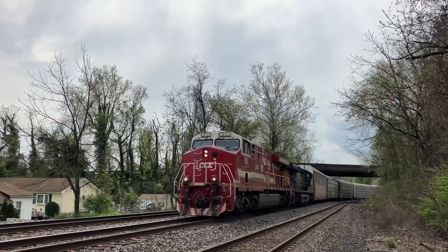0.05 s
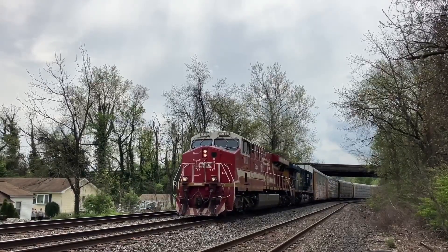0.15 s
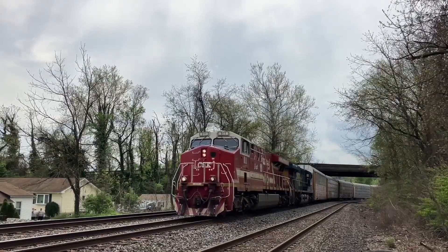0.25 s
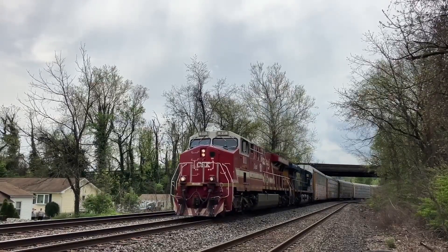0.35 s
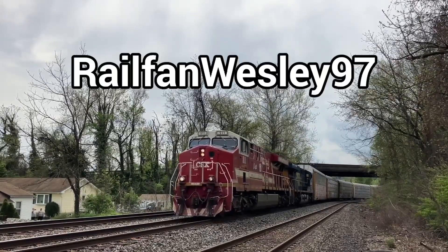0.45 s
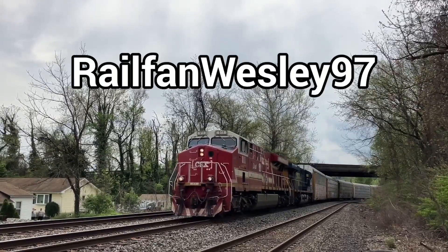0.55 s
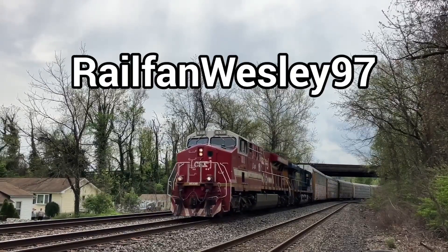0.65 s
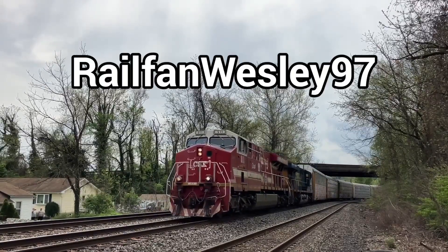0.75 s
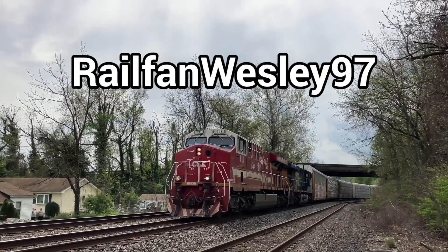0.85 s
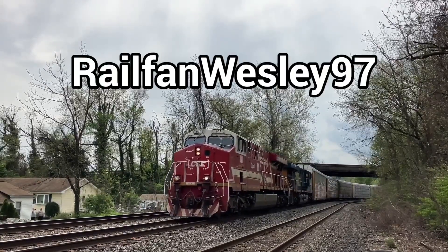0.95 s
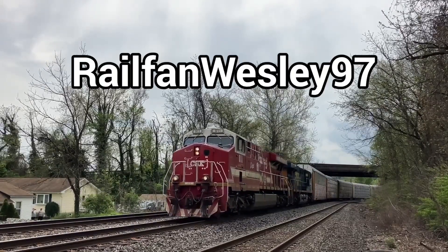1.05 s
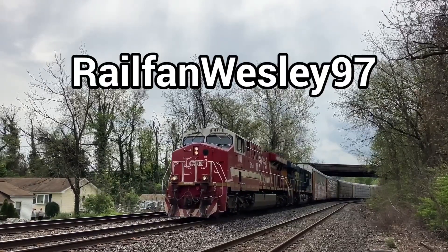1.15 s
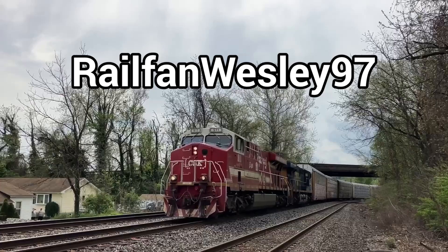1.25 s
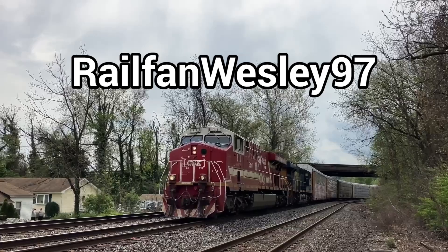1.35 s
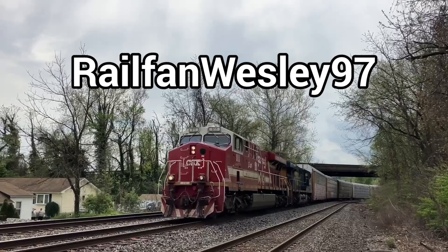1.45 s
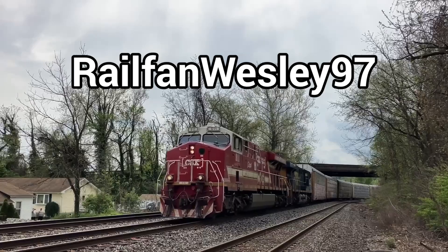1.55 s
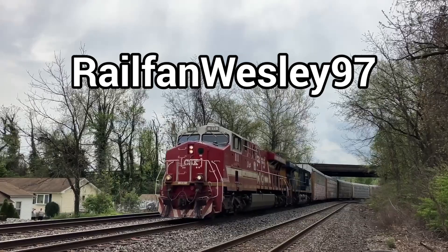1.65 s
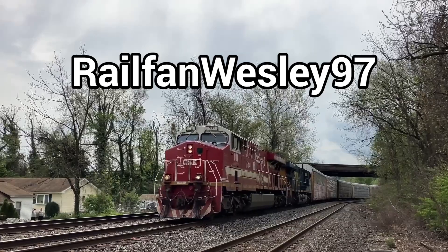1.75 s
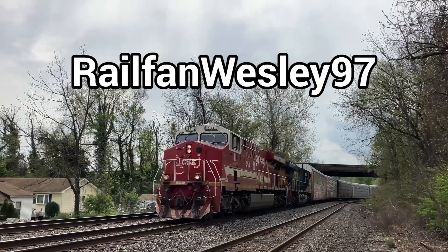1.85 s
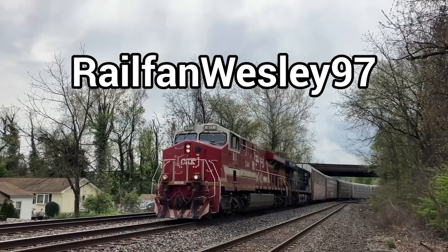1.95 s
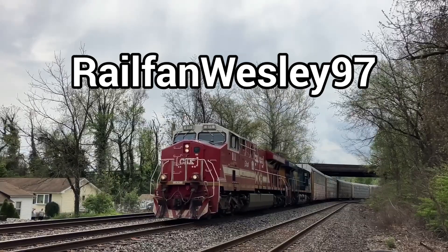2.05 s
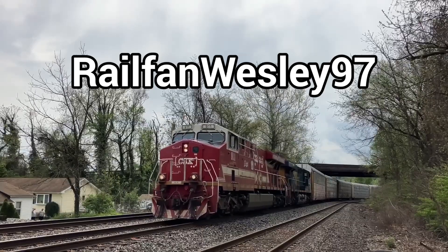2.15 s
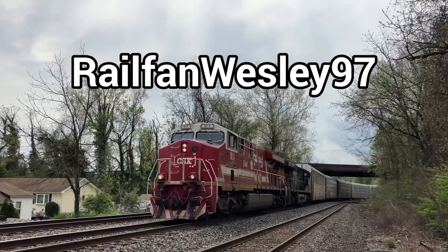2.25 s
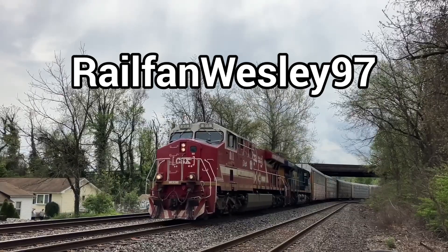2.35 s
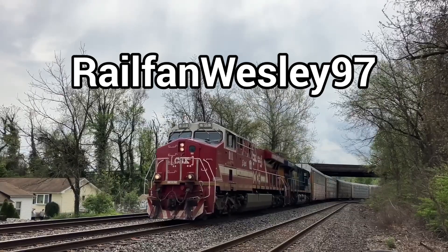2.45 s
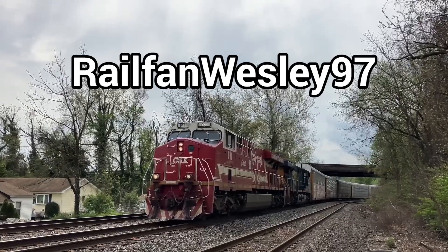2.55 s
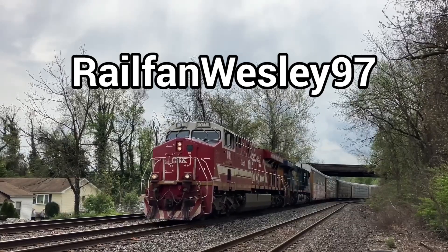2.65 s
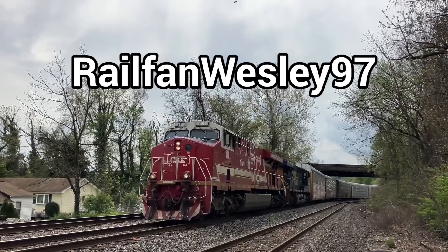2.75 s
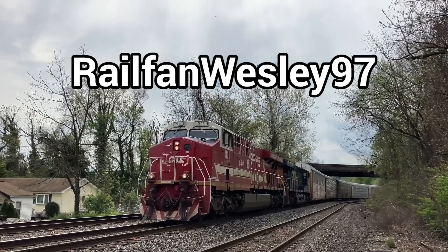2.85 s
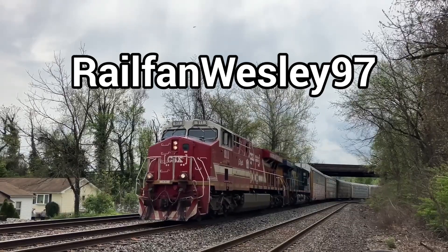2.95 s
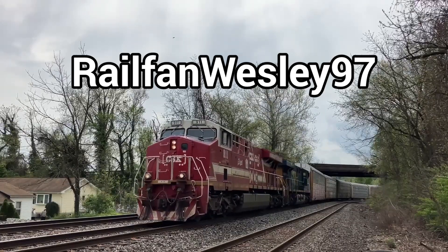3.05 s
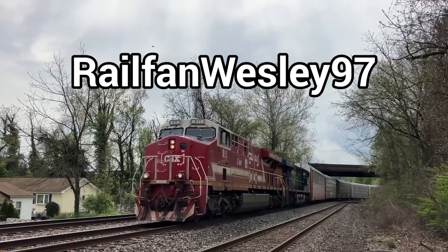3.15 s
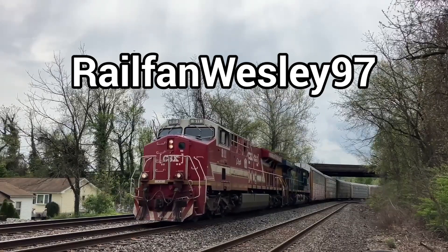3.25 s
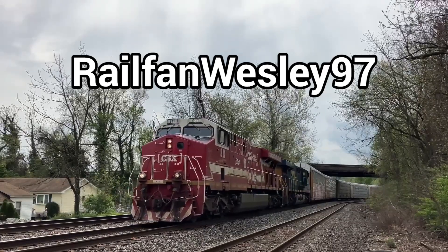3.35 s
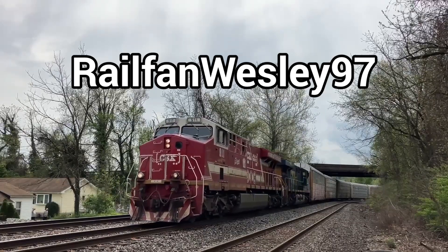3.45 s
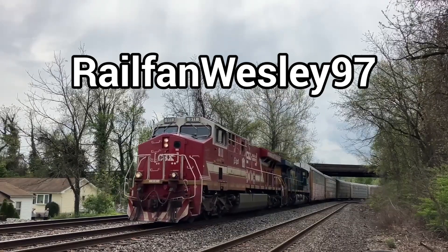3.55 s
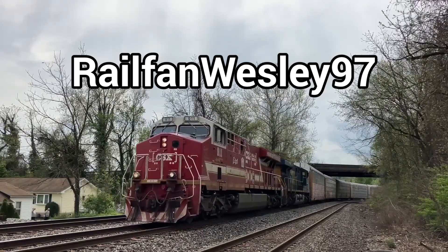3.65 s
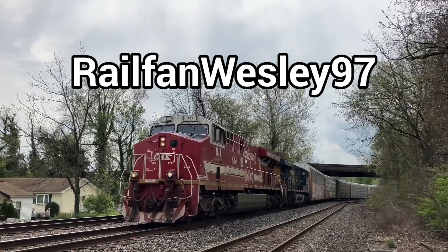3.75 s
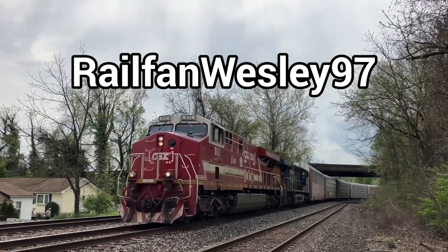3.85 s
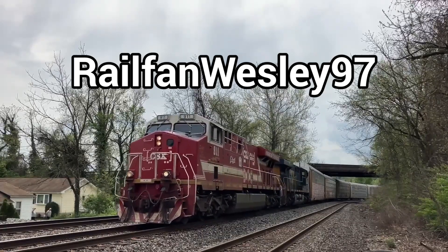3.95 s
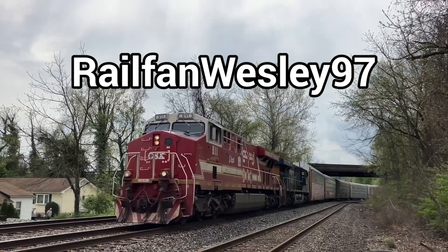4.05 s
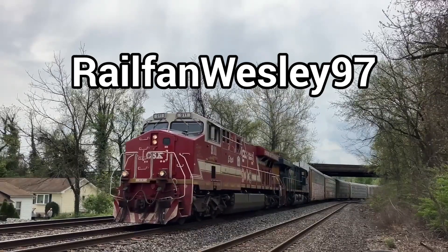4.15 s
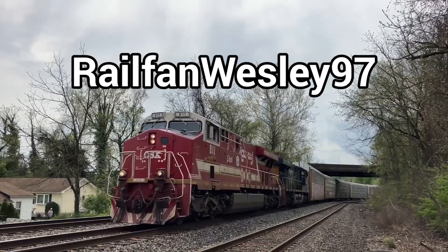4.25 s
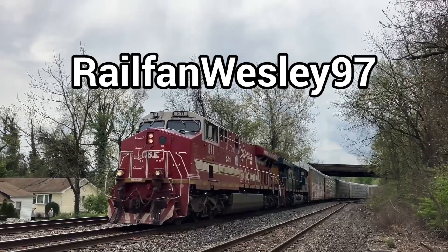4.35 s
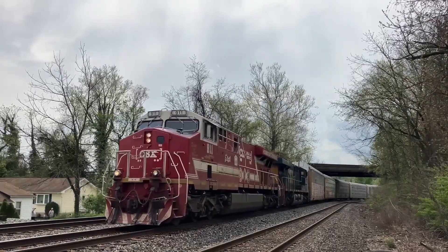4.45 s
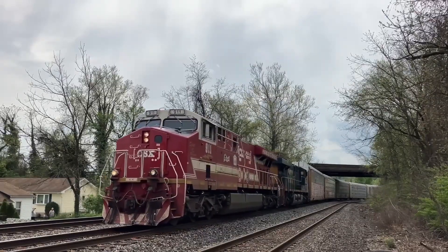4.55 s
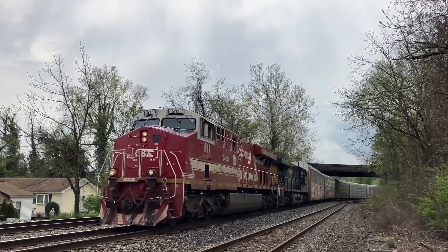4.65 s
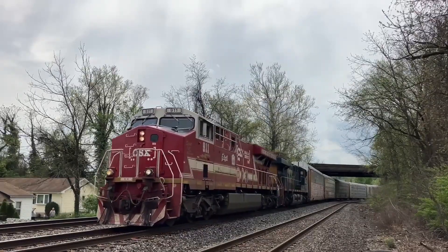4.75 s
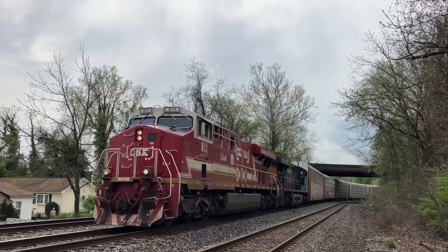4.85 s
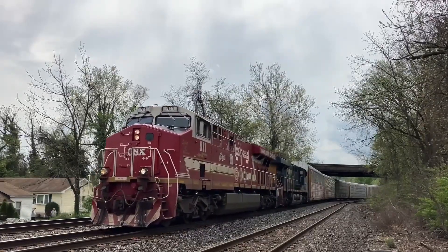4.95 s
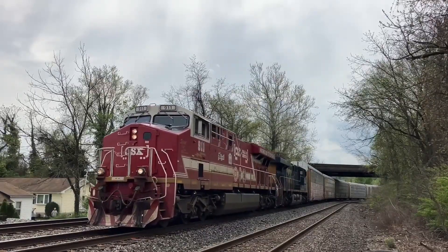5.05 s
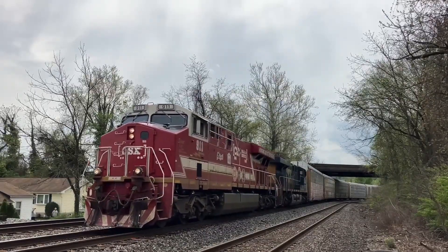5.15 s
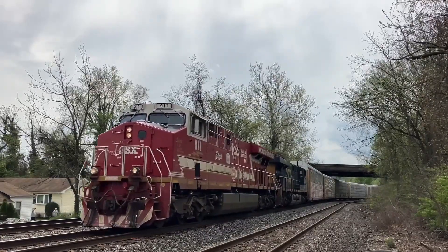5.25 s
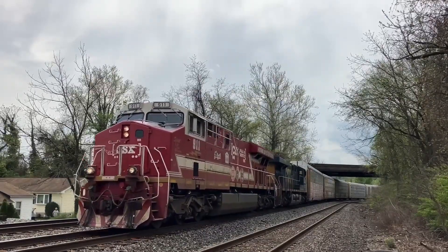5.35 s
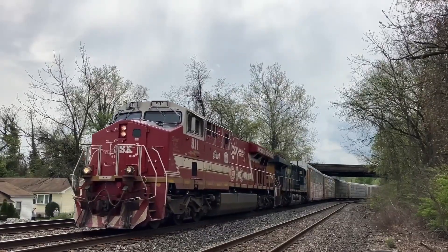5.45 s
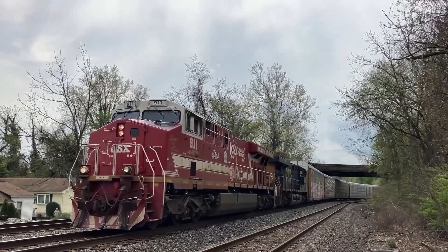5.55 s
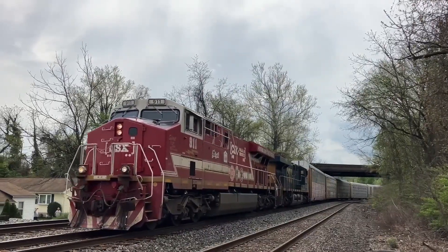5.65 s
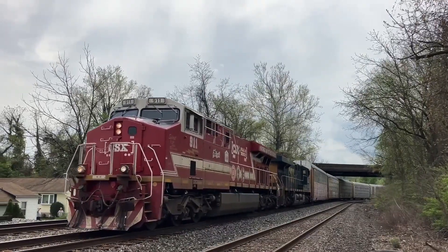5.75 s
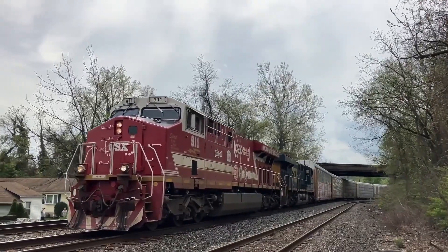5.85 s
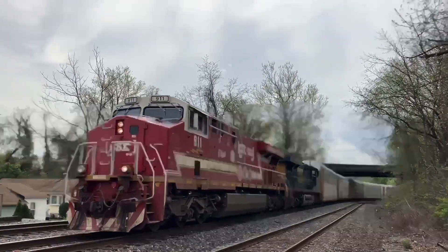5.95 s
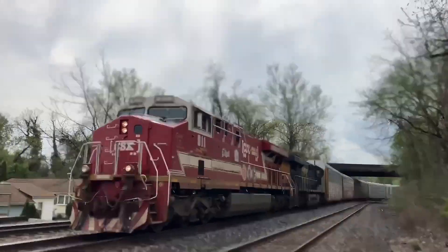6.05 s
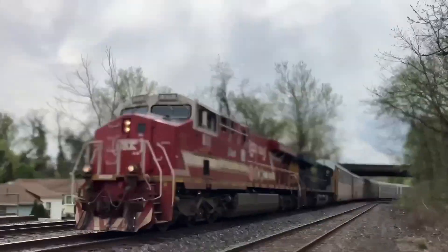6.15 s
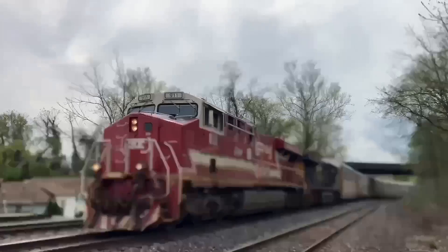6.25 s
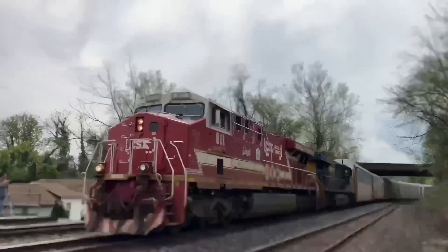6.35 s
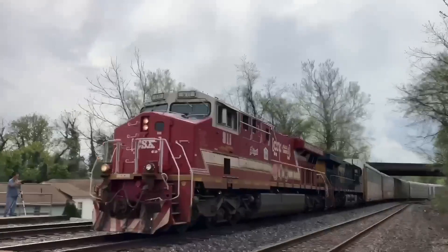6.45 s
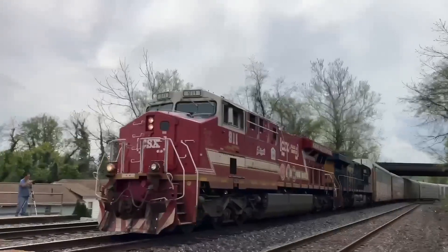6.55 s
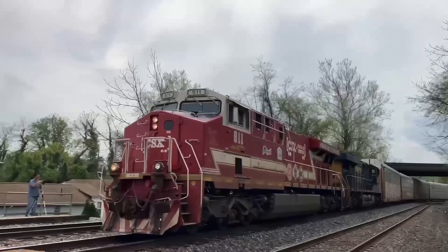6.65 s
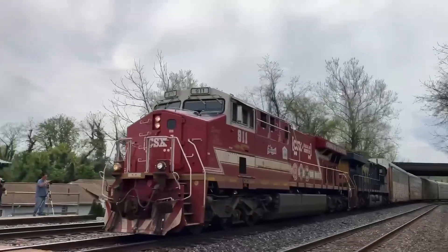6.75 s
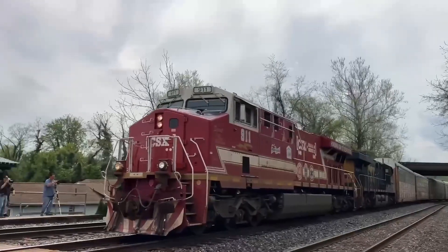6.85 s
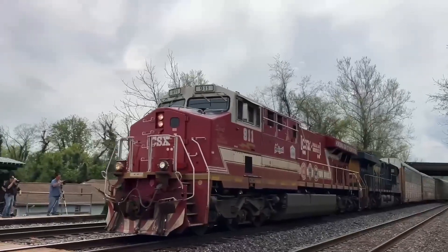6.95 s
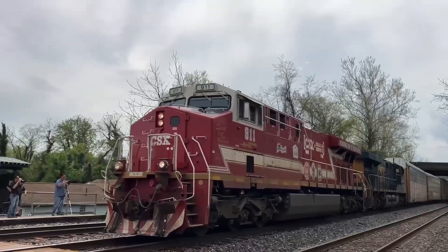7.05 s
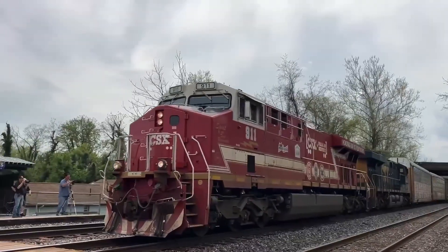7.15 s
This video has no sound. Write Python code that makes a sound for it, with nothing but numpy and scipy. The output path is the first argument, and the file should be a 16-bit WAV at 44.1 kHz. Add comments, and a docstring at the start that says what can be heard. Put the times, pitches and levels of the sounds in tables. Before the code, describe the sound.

Bright, even locomotive bell strokes ring over a low diesel throb and swelling rail hiss, just after a fading horn echoes off trees.

```python
"""The last chord of an air horn dies away among trees while a diesel freight train nears the microphone.
Its warning bell rings on: each stroke is a noisy crack, a short clang and long beating modes.
The exhaust throbs as a fuzzy note with side lines over turbulent noise, and a drone swells with effort.
Wheels roar and hiss on the rails as coloured noise. Late on, short noise snaps tick close to the microphone.
All is heard beside the track, through two microphone ports."""
import sys
import numpy as np
from scipy import signal
from scipy.fft import rfft, irfft
from scipy.io import wavfile
from scipy.ndimage import map_coordinates

SR = 44100
rng = np.random.default_rng(int(sys.argv[2]) if len(sys.argv) > 2 else 0)


def transcribe(u):
    """Save the signal u as a 16-bit wav file named by the first command-line argument.

    u: samples, shape (n,) or (channels, n), limited to [-1, 1]; the rate is SR.
    q: integer samples, one column per channel.
    """
    v = np.clip(np.atleast_2d(u).T, -1, 1)
    q = np.round(v * 32767).astype(np.int16)
    wavfile.write(sys.argv[1], SR, q)


N = 317520
T = np.arange(N) / SR  # time of every sample [s]


def amp(db):
    """Decibels to gain."""
    return 10 ** (np.asarray(db) / 20)


def unit(x):
    """Scales to rms 1."""
    return x / np.sqrt(np.mean(x ** 2) + 1e-20)


def read(points, hz):
    """Reads a frequency table at the given frequencies, along a logarithmic scale."""
    f, value = np.transpose(points)
    return np.interp(np.log(hz + 1), np.log(f + 1), value)


def curve(rows, axis=1):
    """One column of a time table at every sample."""
    rows = np.asarray(rows)
    return np.interp(T, rows[:, 0], rows[:, axis])


def add(mix, s, sound):
    """Lays a sound into the mix at time s, cut off where the mix ends."""
    start = max(round(s * SR), 0)
    part = mix[..., start:][..., :sound.shape[-1]]
    part += sound[..., :part.shape[-1]]


def drift(rate_hz):
    """Slow random wander of rms 1, weakened above the given rate."""
    points = 2048
    hz = np.fft.rfftfreq(points, T[-1] / points)
    lowpass = (hz > 0) / (1 + (hz / rate_hz) ** 4)
    slow = irfft(rfft(rng.standard_normal(points)) * lowpass)
    return unit(np.interp(T, np.linspace(0, T[-1], len(slow)), slow))


def burst(colour, t60, size):
    """A coloured puff of noise that dies away by 60 dB in t60 seconds."""
    spectrum = rfft(rng.standard_normal(size))
    noise = irfft(spectrum * amp(read(colour, np.fft.rfftfreq(size, 1 / SR))))
    return unit(noise) * amp(-60 * np.arange(size) / SR / t60)


def wash(colour, rolloff_db=12):
    """Steady coloured noise at two ports, partly alike; it falls by the octave above its last point."""
    # how alike the two ports hear the noise: (frequency [Hz], left-right likeness [0-1])
    likeness = [(60, .98), (150, .92), (300, .93), (640, .78), (1400, .78), (3000, .7), (5500, .55),
                (8000, .9), (15000, .92)]
    # phase between the ports: (frequency [Hz], lead of the left port [rad])
    left_lead = [(20, 0), (7200, -.2), (8200, -1.5), (9100, -3.1), (11200, -6.3), (13600, -9.4),
                 (15300, -12.4)]
    hz = np.fft.rfftfreq(N, 1 / SR)
    left, other = rfft(rng.standard_normal((2, N)))
    same = np.clip(read(likeness, hz), 0, 1)
    right = same * left + np.sqrt(1 - same ** 2) * other
    right = right * np.exp(-1j * read(left_lead, hz))
    octaves_above = np.log2(np.maximum(hz / colour[-1][0], 1))
    gain = amp(read(colour, hz) - rolloff_db * octaves_above)
    return unit(irfft(np.array([left, right]) * gain, N))


def fuzzy_tone(hz, width_hz, blur):
    """A tone whose strength and phase wander, of rms about 1."""
    turn = 2 * np.pi * (np.cumsum(hz * np.ones(N)) / SR + rng.random())
    in_step = (1 + blur * drift(width_hz)) * np.sin(turn)
    across = blur * drift(width_hz) * np.cos(turn)
    return (in_step + across) / np.sqrt(.5 + blur ** 2)


def level(start_db, db_per_s, effort_db):
    """Gain of a layer that grows as the train nears and as the engine pulls."""
    # the engine pulls harder, then eases off: (time [s], effort [0-1])
    effort = [(0, 0.25), (2.5, 0.27), (3, 0.83), (4.1, 1), (4.4, 0.93), (4.75, 0), (7.2, 0.02)]
    return amp(start_db + db_per_s * T + effort_db * curve(effort))


def horn():
    """The chord has just stopped: it lingers between the trees and comes back once from afar."""
    # partials of the fading chord: (frequency [Hz], level [dB], t60 of the direct sound and echo [s],
    # echo from the trees [dB re level], lingering sound [dB re level])
    partials = [(326.6, -51, 0.91, -3, -17), (391.6, -35.5, 0.85, -26, -16), (436, -48, 1.8, -15, -33.5),
                (523, -44.5, 0.25, -11, -1.5), (660, -46, 0.68, 5.5, -11), (955, -48.5, 0.88, -6, -22.5),
                (1043, -41.5, 0.72, -16, -19.5), (1150, -55.5, 1.1, -13, -24.5),
                (1282, -42.5, 0.79, -24, -47), (1500, -45, 0.9, -30, -50), (2024, -48.5, 1, -35, -41.5),
                (2680, -49, 0.94, -20, -33.5)]
    echo_s, echo_rise_s, linger_t60 = 0.27, 0.064, 5
    port_phase = 0.49  # rad by which each partial is turned, opposite ways at the two ports
    out = np.zeros((2, N))
    after_echo = T - echo_s
    for hz, db, t60, echo_db, linger_db in partials:
        direct = amp(-60 * T / t60)
        echo = amp(echo_db - 60 * np.maximum(after_echo, 0) / t60)
        echo = echo * np.clip(after_echo / echo_rise_s, 0, 1)
        linger = amp(linger_db - 60 * T / linger_t60) * (1 + .5 * drift(36))
        tone = signal.hilbert(fuzzy_tone(hz, width_hz=9, blur=0.3))
        apart = np.exp(1j * rng.choice([-1, 1]) * port_phase * np.array([[1], [-1]]))
        out += amp(db) * (direct + echo + linger) * (tone * apart).real
    return out


def engine():
    """Exhaust note beating with its side lines, turbulent throb, firing-pulsed rumble and a drone under load."""
    # exhaust note: (time [s], frequency [Hz])
    exhaust_note = [(0, 56.02), (1.2, 55.86), (2.2, 55.2), (2.65, 55.18), (3.5, 57.4), (4.05, 58.95),
                    (4.5, 62.3), (5, 61.16), (5.55, 59.36), (6.5, 57.33), (7.2, 54.8)]
    # lines beside the note, from unequal cylinders and from a second locomotive: (multiple of the note,
    # relative level [dB])
    cylinder_lines = [(0.798, -20), (0.932, -23), (1, 5), (1.134, -7), (1.199, -10.5), (1.301, -14.5),
                      (1.41, -16.5), (1.999, -30)]
    # exhaust loudness: (time [s], level [dB])
    exhaust_level = [(0, -32.5), (.45, -37), (.6, -29.5), (1.25, -32), (1.35, -26), (1.65, -30),
                     (1.9, -24.5), (2.25, -27.5), (2.55, -27), (3, -23), (4.3, -23), (4.4, -27.5),
                     (4.9, -27.5), (5.7, -23), (6.1, -26), (6.3, -23.5), (7, -29.5), (7.1, -23)]
    # turbulent exhaust spectrum: (frequency [Hz], relative level per Hz [dB])
    throb_colour = [(20, -39), (33, -14.5), (44, 2.5), (54, 24), (70, 11.5), (90, 14), (130, -47.5)]
    # rumble spectrum: (frequency [Hz], relative level per Hz [dB])
    rumble_colour = [(45, 6), (75, 6.5), (95, 3.5), (125, 1), (165, -6), (215, -17), (310, -12.5),
                     (420, -24), (700, -72)]
    # rumble: (level at the start [dB], growth [dB/s], rise at full effort [dB])
    rumble_level = (-42.5, 2.62, 4.1)
    # drone: (level at the start [dB], growth [dB/s], rise at full effort [dB])
    drone_level = (-60, 1.58, 16.6)

    note = curve(exhaust_note)
    lines = unit(sum(amp(db) * fuzzy_tone(k * note, width_hz=3, blur=.1) for k, db in cylinder_lines))
    exhaust = amp(curve(exhaust_level)) * (lines + amp(-5) * wash(throb_colour))
    firing = 1 + 0.22 * np.sin(2 * np.pi * np.cumsum(note) / SR)
    rumble = level(*rumble_level) * firing * wash(rumble_colour)
    # the drones sit at multiples of the exhaust note
    drone = fuzzy_tone(3.06 * note, width_hz=15.0, blur=0.92)
    upper_drone = amp(-6.5) * fuzzy_tone(5.26 * note, width_hz=90, blur=0.68)
    return exhaust + rumble + level(*drone_level) * (drone + upper_drone)


def wheels():
    """Rolling roar, a hiss from the rails, and a higher sizzle that follows the rail surges in full."""
    # rolling roar spectrum: (frequency [Hz], relative level per Hz [dB])
    roar_colour = [(200, 4), (380, 1.5), (520, 0), (680, 3), (900, -4.5), (1200, -9), (1700, -12),
                   (2400, -16.5), (3300, -28.5), (5000, -35), (8000, -35.5), (12000, -73)]
    # roar: (level at the start [dB], growth [dB/s], rise at full effort [dB])
    roar_level = (-48, 1.9, 0.99)
    # lower rail hiss spectrum: (frequency [Hz], relative level per Hz [dB])
    hiss_colour = [(1500, 9.5), (3000, 9.5), (4500, 7), (5600, 3.5), (7400, -4.5), (8500, -5.5),
                   (10000, -15.5), (13000, -41)]
    # sizzle spectrum: (frequency [Hz], relative level per Hz [dB])
    sizzle_colour = [(4000, -37), (7000, 6), (9000, -6), (11300, -3), (13000, -13), (15500, -15),
                     (16500, -22)]
    # surges of the wheels on the rails: (time [s], level of the sizzle [dB])
    rail_surges = [(0, -80), (2, -74.5), (2.8, -67.5), (3.3, -59), (3.6, -62), (4.2, -60), (4.45, -50.5),
                   (4.8, -52.5), (4.95, -57), (5.55, -58), (5.9, -55), (6.35, -57.5), (6.9, -59.5),
                   (7.05, -51), (7.2, -54)]
    roar = level(*roar_level) * amp(.8 * drift(12)) * wash(roar_colour)
    surge_db = curve(rail_surges)
    gust_db = 1.3 * drift(26)
    # the lower hiss follows the surges by a share only
    hiss = amp(-19 + 0.53 * surge_db + gust_db) * wash(hiss_colour)
    sizzle = amp(surge_db + gust_db) * wash(sizzle_colour)
    return roar + hiss + sizzle


def fading():
    """Gain of a tone as moving ground echoes lift and cancel it."""
    depth, rate_hz = 0.42, 5.5
    wander = drift(rate_hz) + 1j * drift(rate_hz)
    return abs(1 + depth * wander) / np.sqrt(1 + 2 * depth ** 2)


def flutter(x, depth, size=18):
    """Moving air and reflections make each band waver, partly apart at the two ports."""
    z = signal.stft(x, nperseg=512, noverlap=384)[2]
    shape = (3,) + z.shape
    chance = rng.standard_normal(shape) + 1j * rng.standard_normal(shape)
    smooth = np.outer(np.hanning(9), np.hanning(size))  # across frequency bins and time frames
    chance = signal.fftconvolve(chance, smooth[None], "same", axes=(1, 2))
    chance /= np.std(chance)
    shared, apart = chance[0], chance[1:]
    gain = (1 + depth * shared + 0.5 * apart) / np.sqrt(1 + depth ** 2)
    return signal.istft(z * gain, nperseg=512, noverlap=384)[1][:, :N]


def trees(x, t60=0.61, count=24):
    """Scattered echoes from trunks and ground; their paths change as the train moves."""
    t = np.arange(SR * 3 // 4) / SR
    out = np.zeros((2, N))
    for k in range(count):
        sparse = rng.standard_normal((2, len(t))) * (rng.random((2, len(t))) < .05)
        taps = sparse * amp(-60 * t / t60) * (t > .006)
        taps = taps / np.linalg.norm(taps[0])
        # each set of paths fades in and out around its own place in time
        place = T / T[-1] * (count - 1) - k
        here = abs(place) < 1
        part = x[here] * np.cos(np.pi / 2 * place[here])
        add(out, T[here][0], signal.fftconvolve(part[None], taps, axes=1))
    return out


def bell(count=4):
    """Even strokes: a crack, a short clang and long beating partials, cut just after the next stroke."""
    # strokes: (time [s], low clang [dB], bright clang [dB],
    # ring of each of the four singing partials, low to high [4 x dB])
    strokes = [(0.0886, 3, -3, -5, -5, -3.5, 7), (0.775, -0.5, 1, 1.5, -4.5, -1, 6.5),
               (1.4615, 3.5, 2, -1.5, -1, -5.5, 3.5), (2.1469, 0.5, 0, 2, 1, 0.5, -5),
               (2.833, -.5, -3, 2, 1.5, 0.5, -0.5), (3.519, -2, -1, 1, -5, -3, -4),
               (4.2045, 2, 1.5, -0.5, -6, -7.5, 1.5), (4.89, 0, -2, -2, -2, -8, -0.5),
               (5.575, 0, 0, -1.5, 5.5, -6, 3), (6.2605, -1, -1, 4, 4.5, -4, -5.5),
               (6.9446, 0, -5.5, 3.5, 11, 4, 1.5)]
    # modes, the four singing ones first: (frequency [Hz], relative level [dB], t60 [s], swell time [s],
    # distance up to a twin mode that beats with it [Hz], share of the twin)
    bell_modes = [(1554, -38, 3.5, .01, 10, .3), (1735, -40, 3.3, .003, 3.1, .1),
                  (2856, -36, 1.9, .02, 13, .3), (4138, -41, 1.4, .05, 3.5, .4),
                  (781.5, -51.5, 6, .004, 3, .1), (1278, -38, .85, .002, 3, .2),
                  (1366, -38, .7, .002, 4, .2), (1394, -37, .6, .003, 3, .2),
                  (1440, -32.5, .2, .002, 14, .3), (1497, -35.5, .24, .002, 14, .5),
                  (1531, -31, .26, .002, 8, .2), (1549, -32, .4, .012, 2, .2),
                  (1574, -30, .26, .002, 8, .2), (2012, -46, .15, .001, 86, .8),
                  (2245, -47, .2, .001, 86, .7), (2402, -48.5, .55, .002, 4, .2),
                  (2579, -48.5, .25, .002, 70, 1), (2850, -21, .12, .025, 8, .3),
                  (3178, -40, .2, .002, 10, .3), (3187, -53, .8, .01, 4, .2),
                  (3382, -46, .16, .001, 25, .5), (3520, -36, .22, .001, 32, .8),
                  (3709, -47, .15, .001, 20, .4), (4066, -56, .8, .005, 4, .3),
                  (4570, -55, .4, .005, 20, .7), (5507, -45, .6, .09, 65, .25),
                  (5694, -51, .15, .008, 430, .6), (6790, -42, .22, .018, 6, .2),
                  (6786, -55, 2.3, .02, 5, .3), (6989, -59, .9, .02, 4, .3)]
    # crack spectrum: (frequency [Hz], relative level per Hz [dB])
    crack_colour = [(1000, -55), (1250, -24.5), (1400, 1), (1550, 2), (1850, -2.5), (2200, -6), (2700, -15),
                    (3500, -5.5), (4400, -14.5), (5100, -25), (7000, -16.5), (9000, -76)]
    # how well the bell radiates towards the microphone: (frequency [Hz], gain [dB])
    radiation = [(780, 3), (1280, -8), (1450, -1.5), (1600, -2), (2200, 2), (2850, 4.5), (3400, -2.5),
                 (4140, -1.5), (5500, 11), (6900, -1)]
    # the bell grows as it nears, its highest partials more slowly:
    # (frequency [Hz], gain at time zero [dB], growth [dB/s])
    approach = [(1580, -3.5, 1.9461), (2850, -7, 1.87), (4200, -9.5, 3.16), (5930, -7, 0.15),
                (6788, -3.5, 1.1)]
    # the bell's lag at the left port shifts as the microphone turns: (time [s], lag [s])
    left_lag = [(0, 0.000012), (5.8, 0.0000033), (6.6, 0.000048)]
    crack_db, crack_rise_s, crack_t60 = -39.5, 0.00056, 0.29
    bright_hz = 2300  # the bright clang lies above this
    scatter = 0.84  # rad by which the modes start out of step at each stroke

    t = np.arange(32768) / SR  # a stroke lasts 0.74 s
    hz, db, t60, swell, beat, twin = np.transpose(bell_modes)[:, :, None]
    modes = np.exp(2j * np.pi * hz * t) + twin * np.exp(2j * np.pi * (hz + beat) * t)
    modes *= amp(db + read(radiation, hz) - 60 * t / t60) * (1 - np.exp(-t / swell))
    band_hz, start_db, db_per_s = np.transpose(approach)
    singing, clang = np.zeros((count, N)), np.zeros(N)
    for s, low_db, bright_db, *ring_db in strokes:
        near = amp(np.interp(hz, band_hz, start_db + db_per_s * s))
        start_phase = np.exp(1j * scatter * rng.standard_normal(hz.shape))
        struck = near * (modes * start_phase).imag
        crack = burst(crack_colour, t60=crack_t60, size=len(t)) * (1 - np.exp(-t / crack_rise_s))
        crack = amp(crack_db + low_db) * near[0] * crack
        clang_gain = amp(np.where(hz < bright_hz, low_db, bright_db))
        add(singing, s, amp(ring_db)[:, None] * struck[:count])
        add(clang, s, (clang_gain * struck)[count:].sum(0) + crack)
    ringing = clang + sum(partial * fading() for partial in singing)
    left, right = flutter(ringing, depth=.25)
    left = map_coordinates(left, [(T - curve(left_lag)) * SR])
    return amp(0.23) * np.array([left, right]) + amp(-5) * trees(ringing)


def ticks():
    """Dry little noise snaps close to the microphone, each with a faint rattle after it."""
    # ticks: (time [s], relative level [dB], left minus right [dB])
    tick_times = [(5.9589, -19.5, 5.5), (6.0183, -31, 4), (6.2542, -37, -1)]
    # tick spectrum: (frequency [Hz], relative level per Hz [dB])
    tick_colour = [(800, -2), (2400, 12), (4000, 8), (5500, 7), (8000, 1), (11500, 4), (16000, -7)]
    out = np.zeros((2, N))
    for s, db, pan_db in tick_times:
        snap = burst(tick_colour, t60=.011, size=4096)
        rattle = amp(-24) * burst(tick_colour, t60=.07, size=4096)
        pan = amp([[pan_db / 2], [-pan_db / 2]])
        add(out, s, amp(db - 2.5) * pan * (snap + rattle))
    return out


def scene():
    """Everything beside the track, with a 6 ms fade-in."""
    return (horn() + engine() + wheels() + bell() + ticks()) * np.minimum(T / .006, 1)


def record(dry):
    """The two ports differ a little in colour; a low cut at 35 Hz, then a band limit at 16 kHz."""
    # colour difference of the ports: (frequency [Hz], left minus right [dB])
    tilt = [(60, -1.2), (200, -.4), (700, 0), (1400, 1.7), (2800, 1.8), (4400, .6), (6000, -.8), (9000, 0)]
    hz = np.fft.rfftfreq(N, 1 / SR)
    port_db = read(tilt, hz) * np.array([[.5], [-.5]])
    heard = irfft(rfft(dry) * amp(port_db), N)
    heard = signal.sosfilt(signal.butter(8, 35, "highpass", fs=SR, output="sos"), heard)
    band_limit = signal.firwin(511, 16000, window=("kaiser", 9), fs=SR)
    return signal.oaconvolve(heard, band_limit[None], "same")


dry = scene()
out = record(dry)
transcribe(out)
```